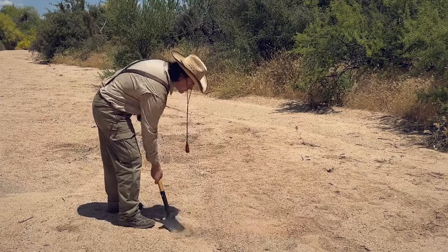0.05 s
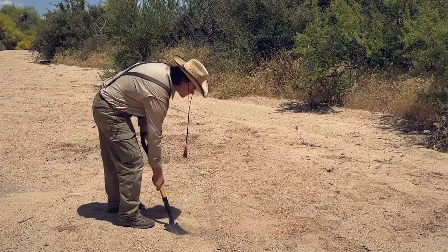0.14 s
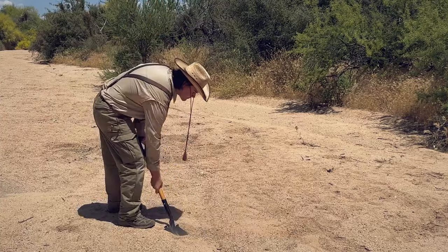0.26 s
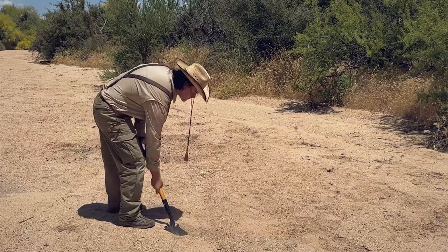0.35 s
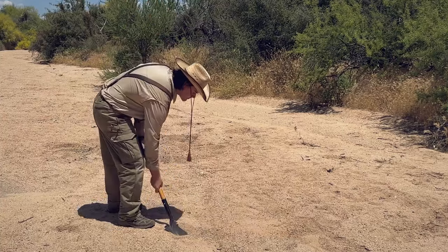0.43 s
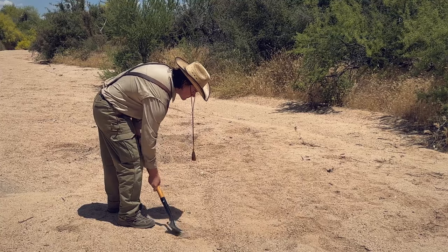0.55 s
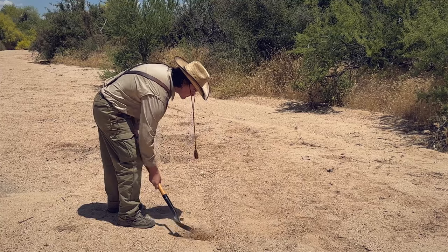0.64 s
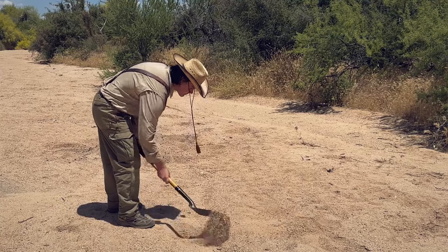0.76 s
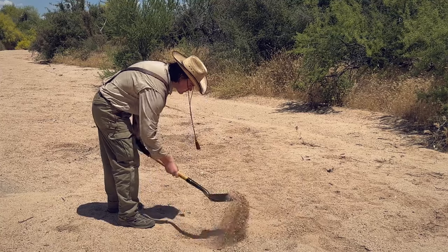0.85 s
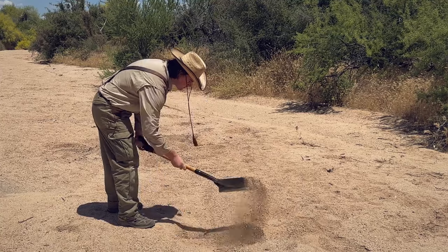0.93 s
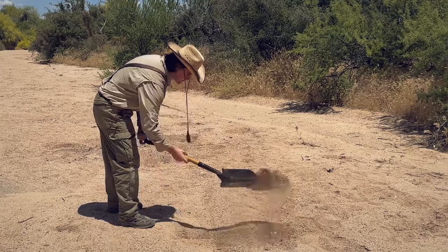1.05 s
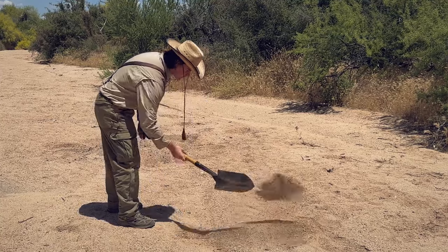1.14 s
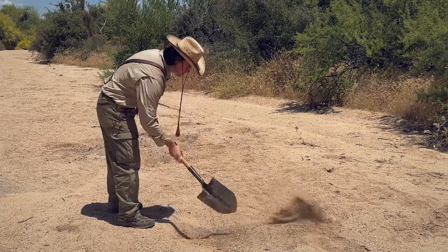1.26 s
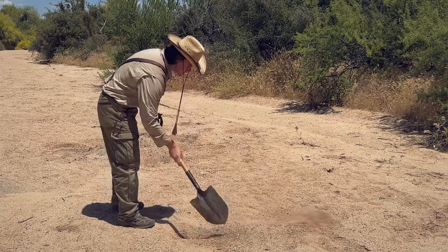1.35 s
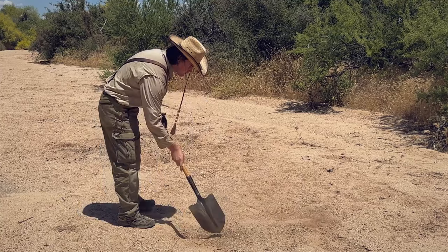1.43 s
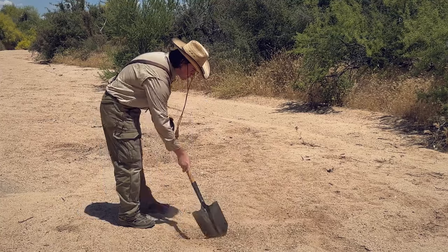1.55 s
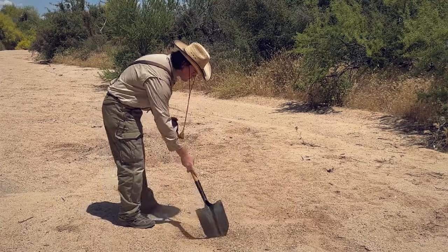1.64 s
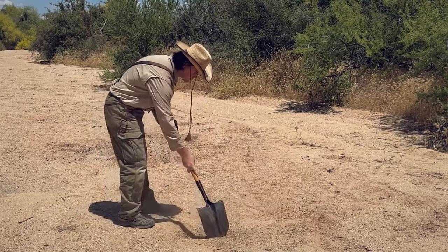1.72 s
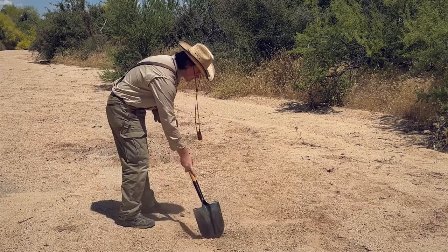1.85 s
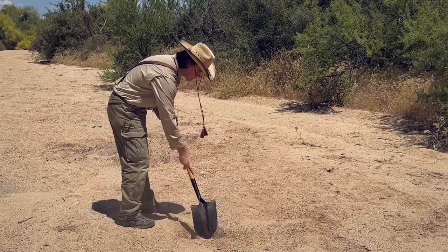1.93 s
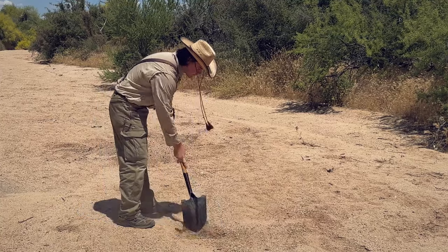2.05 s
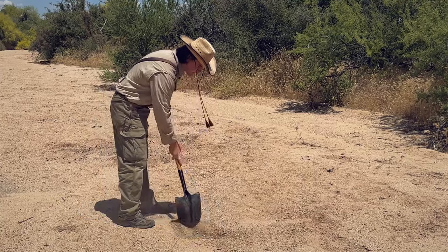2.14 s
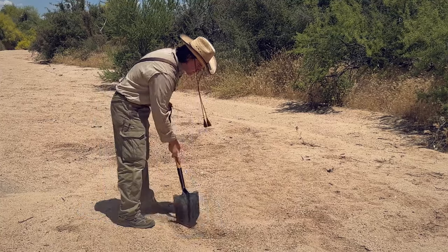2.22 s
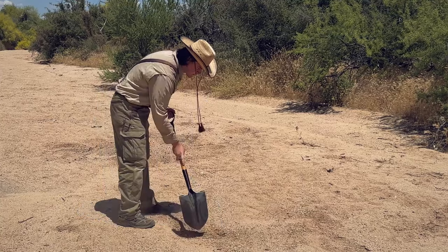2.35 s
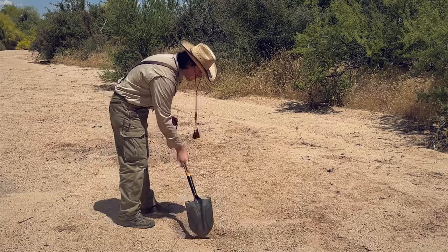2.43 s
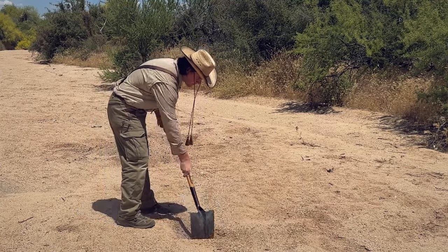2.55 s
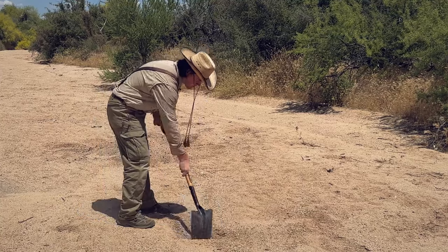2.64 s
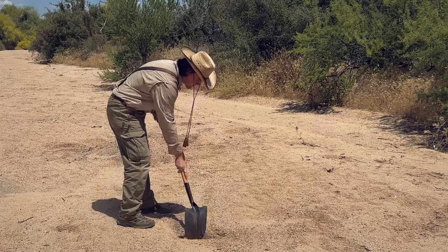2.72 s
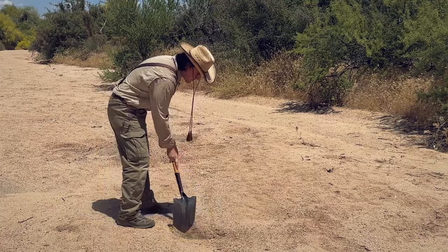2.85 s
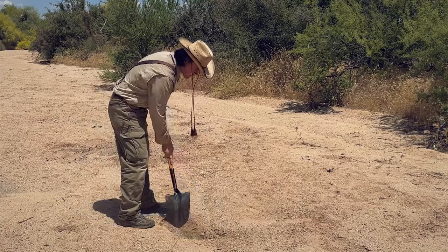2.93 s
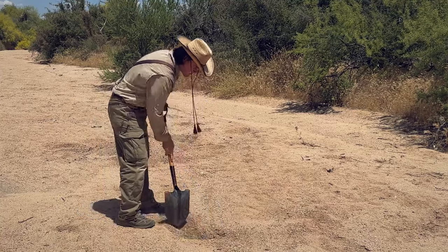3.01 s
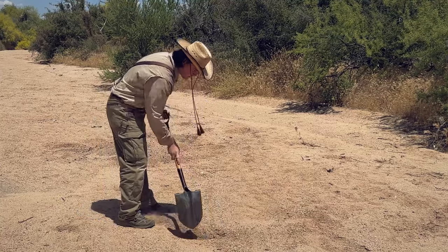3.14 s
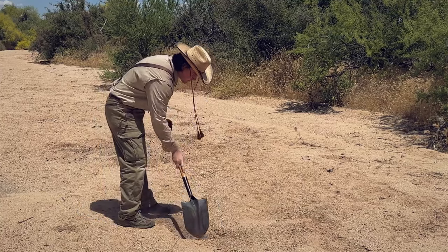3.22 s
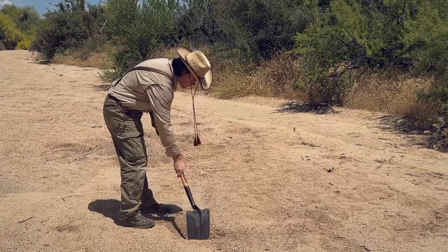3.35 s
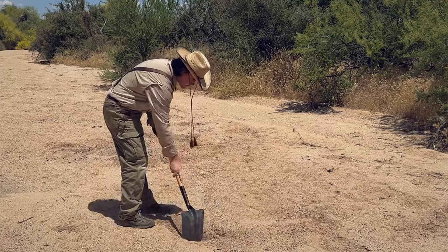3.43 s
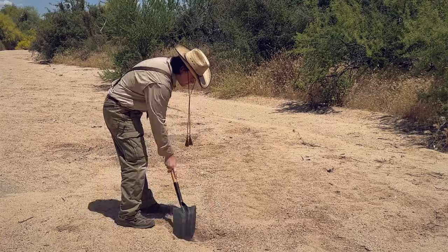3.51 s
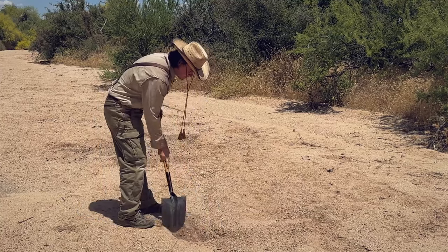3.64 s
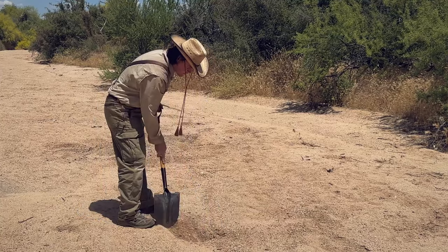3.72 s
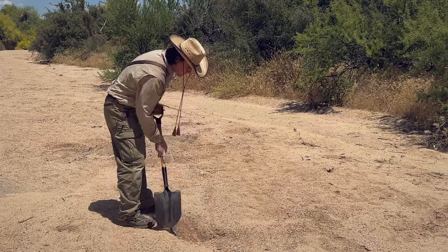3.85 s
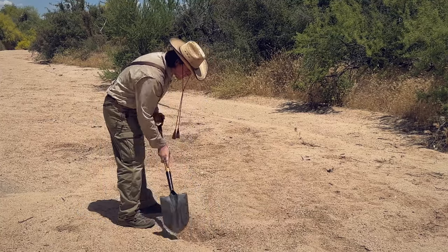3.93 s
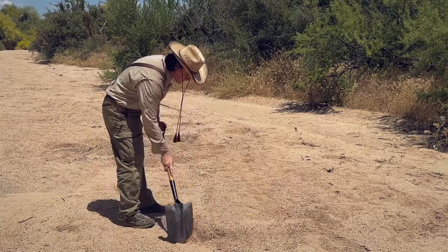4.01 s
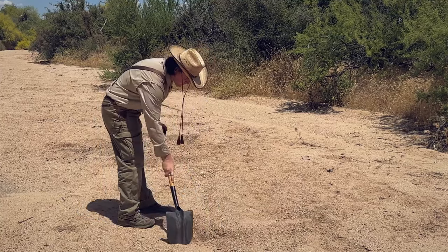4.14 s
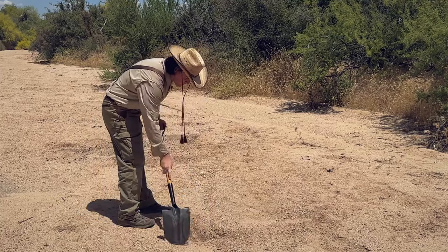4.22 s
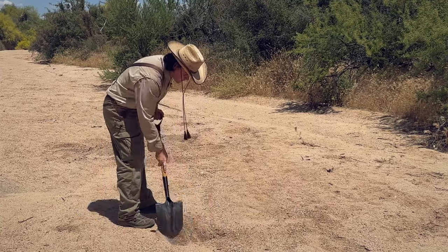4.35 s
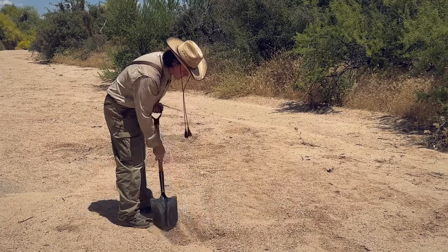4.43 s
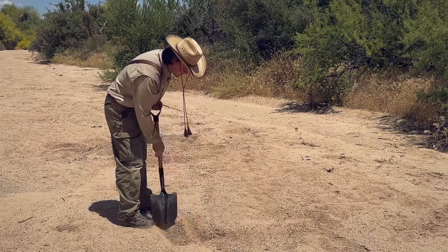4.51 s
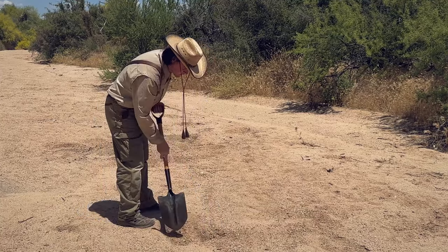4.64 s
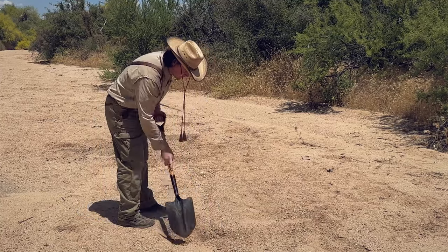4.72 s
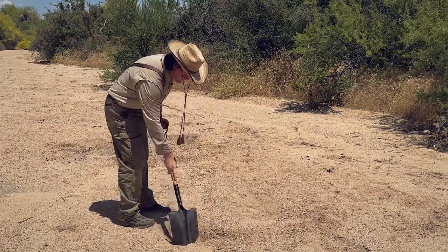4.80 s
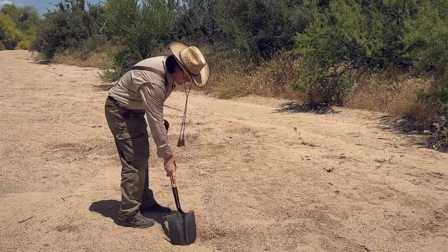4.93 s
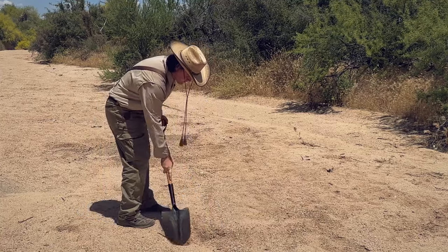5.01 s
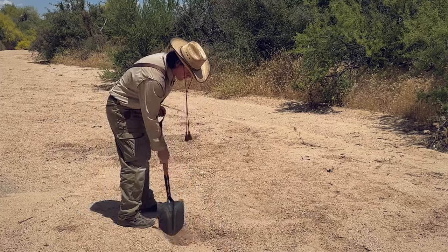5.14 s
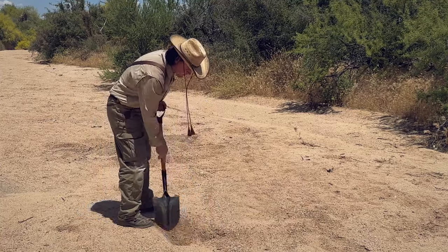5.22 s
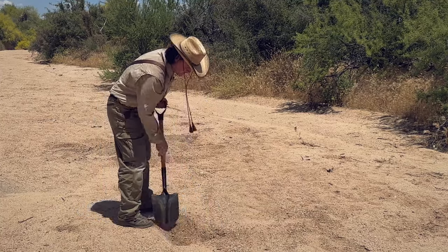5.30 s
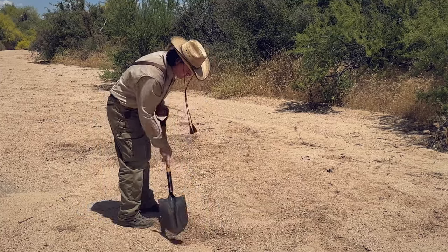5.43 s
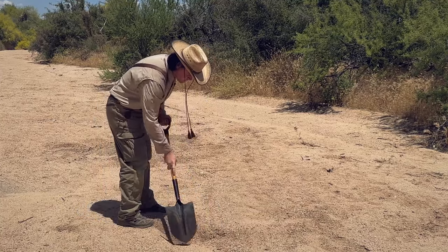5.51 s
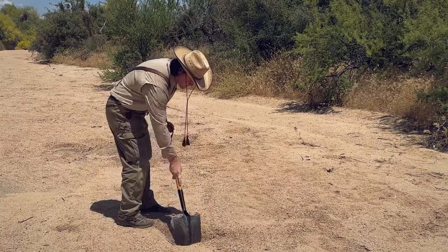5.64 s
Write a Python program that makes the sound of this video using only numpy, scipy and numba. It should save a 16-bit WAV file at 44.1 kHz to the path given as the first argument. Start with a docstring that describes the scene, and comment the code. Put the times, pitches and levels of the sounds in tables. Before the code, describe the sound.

A steel shovel crunches into dry sand, tosses a load that lands with a hiss, then stabs and drags repeatedly over gritty ground outdoors.

```python
"""A steel shovel cuts, lifts and throws dry sandy soil, then taps and drags its edge over the ground, outdoors.
Random grain clicks crackle and drive a bank of blade modes, damped while soil touches; pebbles and the bites of
the edge are force bursts. The thrown sand lands as an airy hiss of dense grains. Filtered noise makes a distant
roar, a wavering low drone and a breeze that buffets the two microphone ports."""
import sys
import numpy as np
from scipy import signal
from scipy.fft import rfft, irfft
from scipy.io import wavfile
from scipy.ndimage import uniform_filter1d
from numba import njit

SR = 44100
rng = np.random.default_rng(int(sys.argv[2]) if len(sys.argv) > 2 else 0)


def to_wav(s):
    """Save 16-bit WAV."""
    ch = np.atleast_2d(s).T  # columns
    pcm = np.round(np.clip(ch, -1, 1) * 32767)  # PCM
    wavfile.write(sys.argv[1], SR, pcm.astype(np.int16))


N = 250047

# Pebbles on steel, and the edge biting the ground at each stab (rows at 1.538, 2.496, 3.295, 4.069, 4.836 and
# 5.613 s). # Each row: time in s, relative level in dB, click pitch in Hz, # relative thud level above that in
# dB, thud pitch in Hz.
HITS = [(0.054, -4, 3460, -21, 900), (0.092, -7.5, 2750, -6, 1520), (0.096, -6, 2490, -15.5, 1480),
        (0.1219, -4.5, 3060, -13, 1120), (0.7044, -33, 2540, -9, 622),
        (0.7544, -28.5, 2190, -1, 845), (0.843, -33.5, 3330, -7, 703), (1.047, -30, 3550, -14, 760),
        (1.4401, -35, 4540, 5, 910), (1.5378, -22, 2520, -18, 622), (1.59, -10, 2450, -11, 756),
        (1.6039, -8.5, 2590, -13, 1540), (2.0083, -13, 2520, -6, 720), (2.121, -11, 2520, -34, 600),
        (2.4964, -23, 2700, -10, 746), (2.5368, -11, 2560, -18, 727), (2.615, -22, 9000, -21, 624),
        (2.8561, -10, 2900, 0.5, 1180), (2.9266, -8, 7970, -26, 705), (2.9498, -12, 5700, -19, 689),
        (3.295, -17, 7000, -16, 816), (3.3163, -14, 2820, -28, 1610), (3.3368, -18, 3570, -4, 1080),
        (3.504, -18, 2850, -24, 600), (3.6523, -11.5, 2420, -6, 1493), (4.0688, -24, 2750, -20, 810),
        (4.0979, -12.5, 3800, -32, 1360), (4.2592, -15.5, 2600, 1, 690),
        (4.338, -7, 4320, -3.5, 665), (4.3714, -6.5, 6900, -6.5, 1580),
        (4.4722, -9.5, 4760, 0.5, 600), (4.8355, -27, 9000, -21, 608),
        (4.8534, -8.5, 3600, -10, 1550), (4.873, -12.5, 2660, -14, 1500),
        (5.1144, -7.5, 6160, -10, 710), (5.6126, -17, 2820, -18, 1350),
        (5.6246, -9, 9200, -25, 1410), (5.6411, -21.5, 2640, -2, 1110)]
# Sand grain spectrum. Each row: frequency in Hz, relative density in dB per Hz.
SAND_SPECTRUM = [(300, -64), (1200, -25.5), (2200, -6), (4000, -4.5), (6000, -3), (8000, -2), (9800, 0),
                 (11500, -3), (13500, -8.5), (16000, -20)]
# Edge stabs the ground. Each row: start in s, first-touch crackle in dB, time to full bite in s,
# full-bite crackle in dB, length in s, mid-stab blade above crackle in dB, low modes above blade in dB,
# crunch above crackle in dB; all levels relative.
EDGE_STABS = [(1.531, -45.5, 0.025, -34.5, .1, 4, -8, -15),
              (2.494, -34.5, 0.027, -31.5, 0.11, -1.5, -3, -15.5),
              (3.293, -36.5, .026, -29, 0.089, -2, -1, -14), (4.064, -49, 0.034, -28, 0.081, -4, -5.5, -13),
              (4.83, -38, 0.026, -30.5, 0.1, 0, -4, -11), (5.605, -37.5, 0.026, -26.5, 0.073, -3, -5, -26)]
# One row for the thrust and each drag: time the edge leaves the soil in s, coarse grit above crackle in dB,
# low modes above blade in dB, crunch above crackle in dB; all levels relative.
DRAG_TONES = [(1.03, -20, -2, -10), (2.22, -0.5, -6, -18.5), (2.99, 2, 1.5, -11.5), (3.85, 1.5, -1.5, -8.5),
              (4.511, -2, -2, -19), (5.28, 1, -1, -10)]


def undb(db):
    """Amplitude ratio from dB."""
    return 10 ** (np.asarray(db) / 20)


def unit(x):
    """Scale to unit RMS."""
    return x / np.sqrt(np.mean(x ** 2))


def curves(rows):
    """Columns of a (s, value, ..) table, one value a sample."""
    s, *columns = np.transpose(rows)
    return [np.interp(np.arange(N) / SR, s, c) for c in columns]


def colour(x, points):
    """Causal minimum-phase filter with the given (Hz, dB) gain, from the folded cepstrum."""
    size = 4096
    hz, db = np.transpose(points)
    bin_hz = np.arange(size // 2 + 1) * SR / size
    log_gain = np.interp(np.log(bin_hz + 1), np.log(hz), db) * np.log(10) / 20
    cep = irfft(log_gain)
    cep[1:size // 2] *= 2
    cep[size // 2 + 1:] = 0
    return signal.fftconvolve(x, irfft(np.exp(rfft(cep))))[:N]


def band(x, hz, kind, order=1):
    """Butterworth filter."""
    return signal.sosfilt(signal.butter(order, hz, kind, fs=SR, output="sos"), x)


def walk(rate_hz):
    """Random levels held 1 / rate_hz s and slewed twice; standard deviation near 0.7."""
    k = int(SR / rate_hz)
    held = np.repeat(rng.standard_normal(N // k + 1), k)
    return 0.97 * uniform_filter1d(uniform_filter1d(held, k), k)[:N]


def grains(per_s, spread_db):
    """Dense clicks of either sign, some much larger than the rest; unit RMS."""
    hit = rng.random(N) < per_s / SR
    sign = rng.standard_normal(N)
    size = np.minimum(rng.exponential(size=N), 3)
    return unit(hit * sign * undb(spread_db * size))


def roar():
    """Distant steady roar: noise wide in the bass and centred in the treble."""
    # Part alike in both ports, then part unlike. Each row: frequency in Hz, relative density in dB per Hz.
    alike = [(20, -0.5), (60, -8.5), (120, -7), (250, -11), (500, -4), (800, -7.5), (1500, -16.5),
             (2700, -27), (4500, -40), (9000, -48.5), (16000, -41)]
    unlike = [(20, 3), (60, -7.5), (120, -25), (250, -17), (500, -11.5), (800, -15.5), (1500, -28.5),
              (2700, -55), (16000, -91.5)]
    mid = unit(colour(rng.standard_normal(N), alike)) * undb(-44.5 + 0.33 * walk(0.94))
    side = unit(colour(rng.standard_normal(N), unlike)) * undb(-51.5 + 0.97 * walk(3.64))
    return np.array([mid + side, mid - side])


def drone():
    """Wavering low tone from afar: a narrow band of noise, heard as an unsteady hum, nearly alike in both ports."""
    # Each row: time in s, level in dB.
    level = [(0.0, -80.5), (0.16, -59.5), (4.28, -46.5), (4.72, -55), (4.79, -66), (5.51, -74), (5.54, -46),
             (5.67, -71)]
    centre_hz, width_hz = 61.2, 4
    edges_hz = [centre_hz - width_hz / 2, centre_hz + width_hz / 2]
    mid, side = band(rng.standard_normal((2, N)), edges_hz, "band")
    stereo = mid + undb(-15.5) * side * np.array([[1], [-1]])
    return undb(curves(level)[0]) * unit(stereo)


def breeze():
    """Turbulence at each port: unrelated rumble and quicker flutter."""
    # Each row: time in s, rumble in dB, flutter in dB, flutter left minus right in dB.
    strength = [(0.0, -71, -44.5, 5), (0.17, -53, -46.5, -12), (0.66, -47.5, -47.5, -16.5),
                (0.88, -49.5, -46.5, -8), (2.65, -52.5, -49.5, -7), (2.75, -63, -56, -16),
                (2.91, -44.5, -48, 1), (3.16, -52, -50, -10.5), (4.09, -42.5, -43.5, -2),
                (4.22, -57, -44, -9), (4.44, -78, -54.5, -17), (5.67, -74, -50, -3.5)]
    # Rumble, then flutter spectrum. Each row: frequency in Hz, relative density in dB per Hz.
    rumble_spectrum = [(10, 0), (25, 0.5), (45, 6.5), (90, -21.5), (200, -17), (2000, -78)]
    flutter_spectrum = [(40, -28), (100, -2.5), (160, -2.5), (300, -5), (600, -10), (2000, -67.5)]

    def buffet(spectrum):
        """One port's noise, its level wandering."""
        return unit(colour(rng.standard_normal(N), spectrum)) * undb(1.7 * walk(6))

    rumble_db, flutter_db, pan_db = curves(strength)
    rumble = np.array([buffet(rumble_spectrum) for _ in range(2)])
    flutter = np.array([buffet(flutter_spectrum) for _ in range(2)])
    return undb(rumble_db) * rumble + flutter * undb(flutter_db + np.array([pan_db, -pan_db]) / 2)


def landing():
    """A shovelful of thrown sand patters down: dense grain impacts heard as an airy hiss."""
    # Each row: time in s, level in dB.
    level = [(1.27, -67), (1.306, -40.5), (1.338, -47), (1.364, -42), (1.394, -61), (1.43, -69)]
    # Each row: frequency in Hz, relative density in dB per Hz.
    spectrum = [(1470, -45), (2500, -12), (3080, -12), (4650, -13), (5560, -5), (7590, -2), (9290, -9),
                (10300, -3), (14900, -4), (16000, -12.5)]
    db, = curves(level)
    falling = (db > db[0]) * (db > db[-1])  # silent outside the table
    return undb(db) * falling * unit(colour(grains(9900, spread_db=2.0), spectrum))


def movements():
    """Every movement as a (s, crackle dB, blade dB) curve with its coarse, low and crunch levels."""
    # Thrust into the soil, then five drags of the edge, a block each.
    # Each row: time in s, sand crackle in dB, blade above crackle in dB; levels relative.
    drags = [
        [(0.0, -28, 1.5), (0.092, -28.5, 0.5), (0.18, -35.5, -0.5), (0.21, -55, 1)],
        [(1.77, -66, 2), (1.788, -44.5, 1), (1.816, -36, -0.5), (1.966, -37, -4.5), (2.04, -28.5, -4.5),
         (2.078, -34, -4), (2.102, -32, -4), (2.138, -26.5, -8), (2.188, -33.5, 0.5), (2.26, -63, -2.5)],
        [(2.6, -45, -6), (2.62, -44, -9), (2.636, -55.5, -2.5), (2.708, -42.5, -6), (2.836, -46, -5),
         (2.854, -27.5, -6.5), (2.876, -46, -0.5), (2.916, -40, -8), (2.926, -30, -18), (3.03, -62, -4)],
        [(3.38, -47, 0), (3.4, -40.5, -3.5), (3.436, -37.5, -6.5), (3.568, -32.5, -5.5), (3.598, -34.5, 0.5),
         (3.61, -41.5, -8), (3.658, -31, -2.5), (3.752, -45.5, -9.5), (3.838, -53, 3), (3.87, -69, 1)],
        [(4.145, -59, -3), (4.163, -46.5, -9), (4.177, -53, 1.5), (4.269, -34.5, -5.5), (4.377, -30, -10.5),
         (4.389, -33, -7), (4.429, -28.5, -7), (4.505, -36.5, -9.5), (4.521, -49.5, -3), (4.56, -72, -1)],
        [(4.925, -48, -1), (4.939, -50, 1), (4.979, -36, -5), (5.063, -31, -6.5), (5.067, -34.5, -5),
         (5.145, -33.5, -3), (5.185, -38, -7), (5.211, -33.5, -5), (5.267, -45.5, -12), (5.31, -55, -4)],
    ]
    # Sand shifts as the blade is levered, lifted, thrown and set back, a block each; columns as for the drags.
    handling = [
        [(0.21, -56, -2), (0.266, -59, 4), (0.316, -53, -3), (0.338, -62, -4), (0.352, -91, -1), (0.36, -85, 6)],
        [(0.42, -87, 8), (0.432, -75, -6), (0.514, -61, 5.5), (0.542, -56.5, -4), (0.632, -53, 5),
         (0.682, -51.5, -5), (0.722, -61, 8.5), (0.852, -64, 3), (0.86, -71, 0)],
        [(0.86, -70, -4), (0.864, -62, -19), (0.956, -59, 11), (1.032, -65.5, 6), (1.052, -48.5, 1),
         (1.068, -57.5, 16), (1.106, -54, 7), (1.182, -69, 9), (1.28, -63, -4)],
        [(1.62, -54, -2), (1.634, -57, -3), (1.692, -58, 3), (1.722, -53, -2), (1.758, -74, 9), (1.77, -62, 4)],
    ]
    # Loose sand trickles after the throw and after each drag.
    # Each row: peak time in s, relative crackle in dB, fall in dB per s.
    trickles = [(1.43, -62.5, 150), (2.3, -58.5, 198), (3.05, -59, 188), (3.86, -59.5, 230),
                (4.63, -55.5, 114), (5.33, -56, 95)]
    touch_s, sink_db, end_share, end_db = 0.0024, -11.5, 0.86, -30  # sink_db and end_db relative to the bite
    ring_rise_db = 9  # blade gain on the crackle through a stab
    slight_db = 1.5, -3, 1.5  # coarse, low, crunch
    rise_s, fall_s, trickle_blade_db = 0.15, 0.33, -4

    for s, touch_db, bite_s, bite_db, length_s, blade_db, low_db, crunch_db in EDGE_STABS:
        times = np.array([0, touch_s, bite_s, end_share * length_s, length_s])
        db = [touch_db - 33, touch_db, bite_db, bite_db + sink_db, bite_db + end_db]
        rising_blade_db = blade_db + ring_rise_db * (times / length_s - .5)
        yield np.transpose([s + times, db, rising_blade_db]), -1, low_db, crunch_db
    for rows, (_, *tone_db) in zip(drags, DRAG_TONES):
        yield rows, *tone_db
    for rows in handling:
        yield rows, *slight_db
    for s, db, fall_db_per_s in trickles:
        rows = [(s - rise_s, db - 16, trickle_blade_db),
                (s, db, trickle_blade_db),
                (s + fall_s, db - fall_db_per_s * fall_s, trickle_blade_db)]
        yield rows, *slight_db


def forces():
    """Crackle level, and coarse grit, blade, low modes and crunch above it; overlaps sum in power."""
    power = np.full((5, N), 1e-12)
    for rows, coarse_db, low_db, crunch_db in movements():
        s, db, blade_db = np.transpose(rows)
        span = np.arange(int(s[0] * SR), min(int(s[-1] * SR), N))
        db, blade_db = (np.interp(span / SR, s, c) for c in (db, blade_db))
        levels = [db, db + coarse_db, db + blade_db, db + blade_db + low_db, db + crunch_db]
        power[:, span] += undb(levels) ** 2
    db = 10 * np.log10(power)
    return db[0], *(db[1:] - db[0])


def touch():
    """Soil holds the edge (1) from the start and from each stab, until it lifts off (0)."""
    lift_off_s = .03
    t = np.arange(N) / SR
    starts = [-1] + [row[0] for row in EDGE_STABS]
    ends = [row[0] for row in DRAG_TONES] + [N / SR + 1]
    return sum((t >= a) * np.clip((b - t) / lift_off_s + .5, 0, 1) for a, b in zip(starts, ends))


@njit
def resonate(x, poles, gains, keep):
    """Bank of ringing modes; keep < 1 adds damping, and each mode takes a changing share of the force."""
    y = np.zeros(len(x))
    for k in range(len(poles)):
        z = 0j
        for i in range(len(x)):
            z = z * poles[k] * keep[i] + gains[k, i >> 8] * x[i] + 1e-18
            y[i] += z.imag
    return y


def ring(x, modes, keep, low_hz, shift_db, hold=6):
    """Steel modes of a (Hz, dB, t60) table; the point of contact wanders, so each mode comes and goes."""
    hz, db, t60_s = np.transpose(modes)
    share = rng.standard_normal((len(hz), N // 256 + 1))  # one value per 256 samples
    share = uniform_filter1d(share, int(hold)) * np.sqrt(int(hold))
    decay = np.log(1000) / (np.maximum(t60_s, .02) * SR)
    poles = np.exp(2j * np.pi * hz / SR - decay)
    y = resonate(x, poles, undb(db[:, None] + shift_db * share), keep)
    return band(y, low_hz, "high", order=4)  # the blade radiates little below its modes


def high_modes(count):
    """Evenly dense weak modes, as of a thin plate, as strong as the sand colour at their pitch."""
    low_hz, high_hz, t60_s = 4500, 15800, .15
    hz = np.linspace(low_hz, high_hz, count) * (1 + 0.0041 * rng.standard_normal(count))
    sand_hz, sand_db = np.transpose(SAND_SPECTRUM)
    db = np.interp(np.log(hz), np.log(sand_hz), sand_db)
    return np.transpose([hz, db, np.full(count, t60_s)])


def knocks(db, crumble_s, hz, pitched):
    """Short force burst at each pebble or bite of the edge, partly at its own pitch, dying away as the soil
    round it crumbles."""
    t = np.arange(2000) / SR
    out = np.zeros(N + len(t))
    noises = rng.standard_normal((len(HITS), len(t)))
    envelope = np.exp(-t / crumble_s) * np.minimum(t / 0.0013, 1)
    for (s, *_), level_db, f, noise in zip(HITS, db, hz, noises):
        burst = noise + pitched * np.sin(2 * np.pi * f * t)
        out[int(s * SR):][:len(t)] += undb(level_db) * burst * envelope
    return out[:N]


def shovel():
    """Grains crackle in the air and drive the blade, which rings freely only once it leaves the soil."""
    # Low, then main blade modes. Each row: frequency in Hz, relative level in dB, free t60 in s.
    low_modes = [(842, 1, 0.048), (1111, 0, 0.091), (1368, 3.5, 0.022), (1552, -1.5, 0.13),
                 (1780, -1.5, 0.029)]
    blade_modes = [(2344, -2, .2), (2444, -1, .25), (2632, -1, .15), (2833, -1, .15), (2955, -2, .15),
                   (3122, -2, .2), (3321, -4, .7), (3483, -3, .5), (3595, -4.5, .6), (3811, -5, .3),
                   (4020, -8, .15), (4226, -8, .5), (4320, -9, .3), (4608, -9, .15), (4834, -12, .3),
                   (5028, -9, .3), (5292, -13, .25), (6055, -11, .15), (6700, -10, .2)]
    # Soil crushed under the edge. Each row: frequency in Hz, relative density in dB per Hz.
    crunch_spectrum = [(150, -21.5), (300, -4.5), (450, -1.5), (700, -0.5), (1000, -20), (3000, -33)]
    soil_t60_s = .034  # damping that soil adds
    coarse_hz = (4200, 6500)  # coarse grit band

    sand_db, coarse_db, blade_db, low_db, crunch_db = forces()
    loss = np.clip(touch(), .02, 1) * np.log(1000) / (soil_t60_s * SR)
    keep = np.exp(-loss)
    judder = undb(sand_db + 2.1 * walk(70) + 1.2 * walk(200))  # the edge sticks and slips
    rub = np.sqrt(loss) * judder  # a more damped blade needs more force for the same loudness
    _, peak_db, click_hz, thud_db, thud_hz = np.transpose(HITS)

    sand = undb(-6) * judder * unit(colour(grains(7000, spread_db=2.8), SAND_SPECTRUM))
    # single grains tick, plainest when the crackle is faint
    ticks = undb(0.74 * sand_db - 27) * unit(colour(grains(90, spread_db=4.0), SAND_SPECTRUM))
    high_force = undb(-14.0) * rub * grains(9000, spread_db=1.0)
    grit = sand + ticks + ring(high_force, high_modes(count=100), keep, 4840, shift_db=4.0)
    grit = band(grit, coarse_hz, "bandstop") + undb(coarse_db) * band(grit, coarse_hz, "bandpass")

    clicks = colour(knocks(peak_db - 11, 0.0031, click_hz, pitched=1.0), SAND_SPECTRUM)
    crunch = undb(crunch_db) * judder * unit(colour(grains(4000, spread_db=5.0), crunch_spectrum))

    blows = knocks(peak_db - 49, 0.0029, click_hz, pitched=0.86)
    blade_force = undb(-3.5) * rub * undb(blade_db) * grains(8000, spread_db=2.0) + blows
    blade = ring(blade_force, blade_modes, keep, 2240, shift_db=3.5)

    thuds = knocks(peak_db + thud_db - 50.5, 0.0062, thud_hz, pitched=1.46)
    low_force = undb(-4.0) * rub * undb(low_db) * grains(6000, spread_db=2.5) + thuds
    # the low modes bend the whole blade, so soil at the edge damps them less
    low = ring(low_force, low_modes, keep ** 0.92, 680, shift_db=3.0)
    return grit + clicks + crunch + blade + low


def scene():
    """Background, thrown sand and shovel summed; sand and shovel are centred."""
    return roar() + drone() + breeze() + landing() + shovel()


def record(dry):
    """The recorder cuts the top steeply: elliptic low-pass."""
    top_hz = 15720
    return signal.sosfilt(signal.ellip(14, .3, 75, top_hz, fs=SR, output="sos"), dry)


dry = scene()
out = record(dry)
to_wav(out)
```